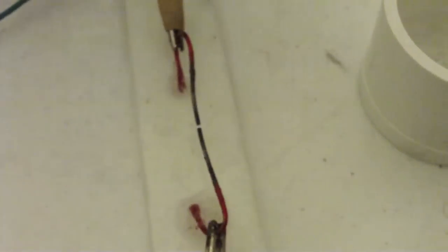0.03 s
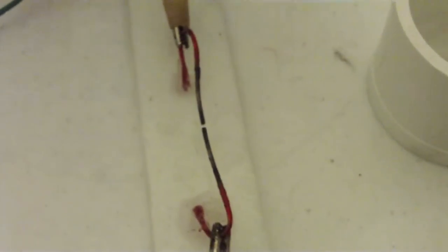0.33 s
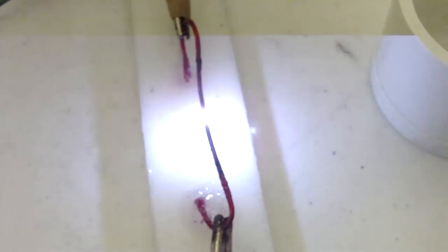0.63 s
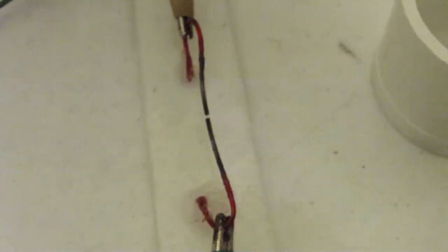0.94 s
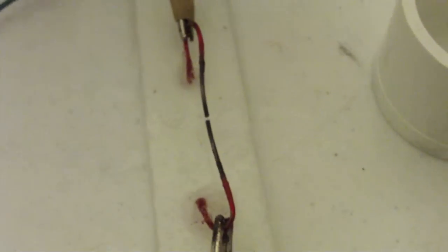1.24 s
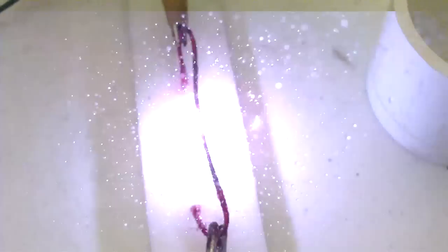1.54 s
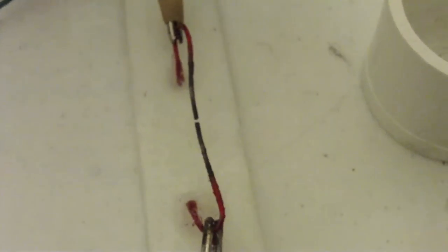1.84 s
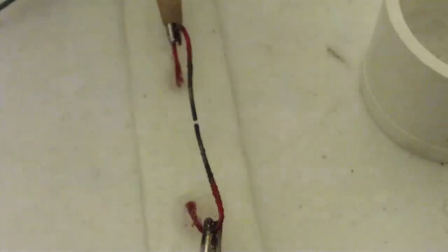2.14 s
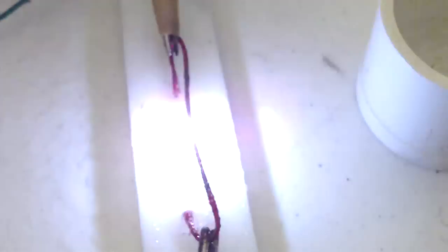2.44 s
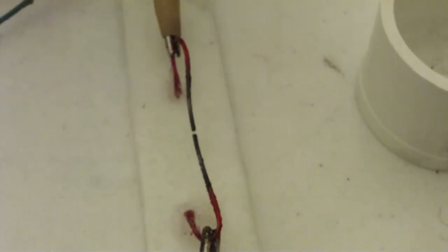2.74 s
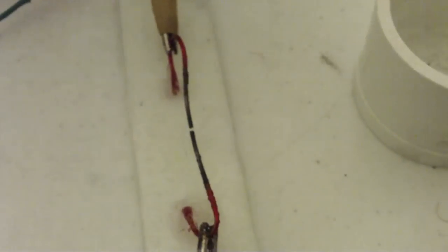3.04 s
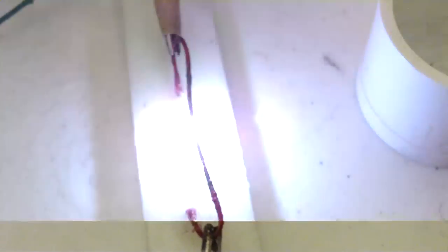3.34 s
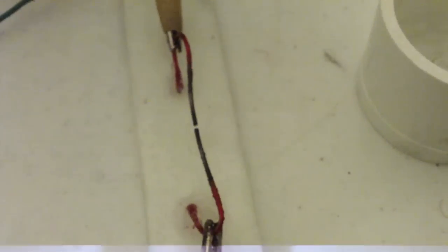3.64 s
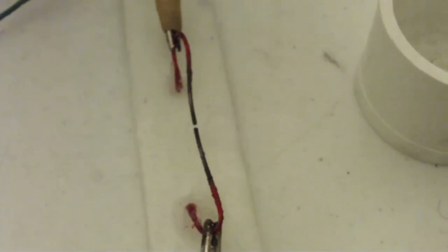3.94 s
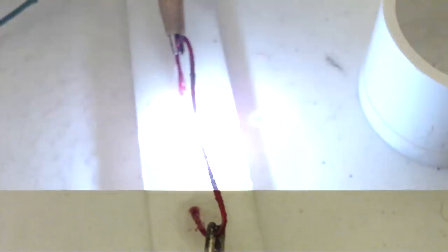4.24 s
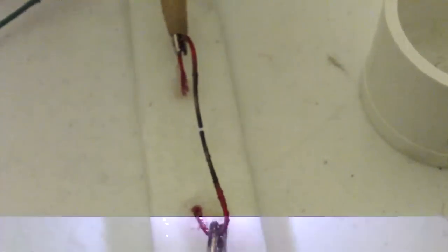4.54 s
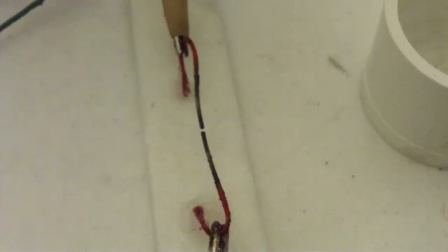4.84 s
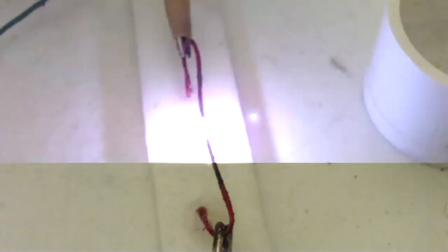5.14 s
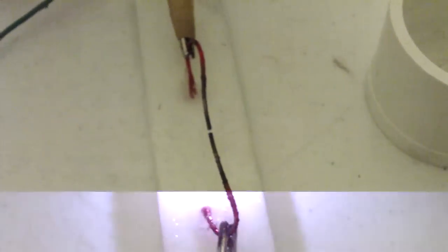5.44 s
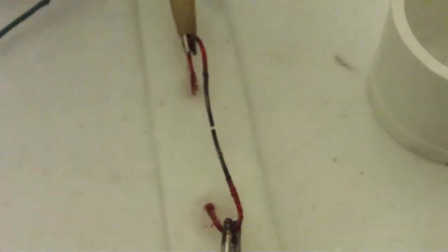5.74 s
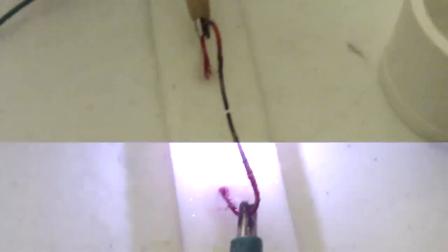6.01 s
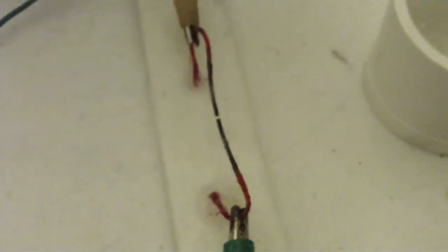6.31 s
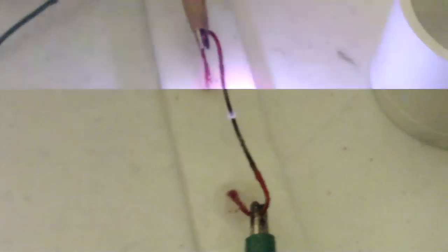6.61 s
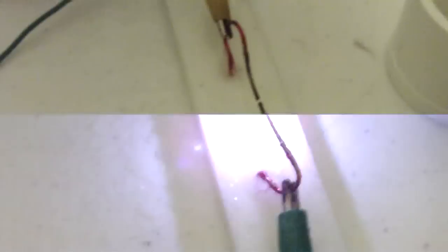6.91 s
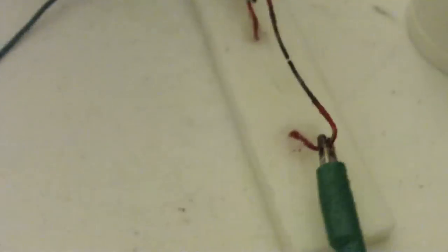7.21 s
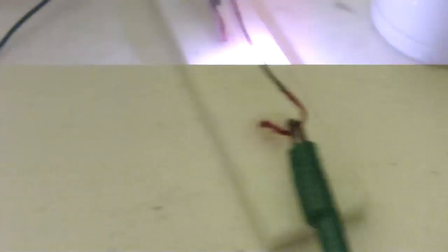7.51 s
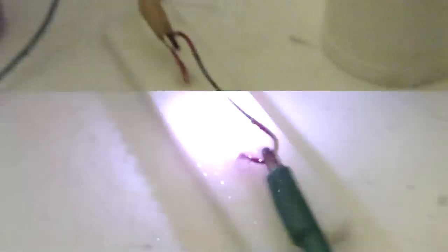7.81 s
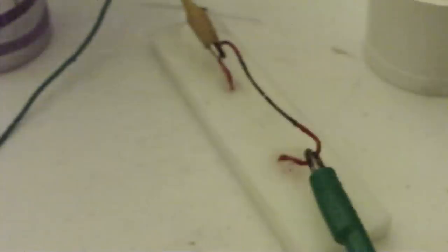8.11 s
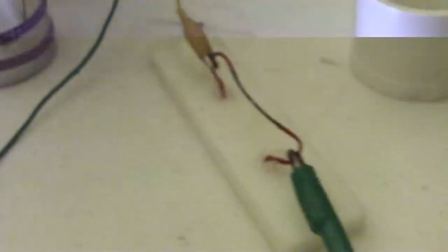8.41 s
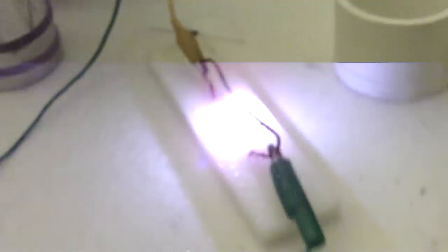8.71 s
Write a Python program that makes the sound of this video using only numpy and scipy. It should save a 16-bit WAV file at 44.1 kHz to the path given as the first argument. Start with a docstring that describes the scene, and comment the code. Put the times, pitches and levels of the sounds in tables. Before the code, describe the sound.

In a small hard room, a relay clatters in a fast, even beat while an electric spark cracks with each knock. Light at first, the sparks jump in level after about a second and a half, overloading the close microphone. They miss a few beats, leaving only the relay, and gradually soften as the rhythm carries on. Faint low rumble and occasional soft handling bumps lie underneath.

```python
"""A relay knocks and a spark gap snaps, nine times a second, over the faint rumble of a small hard room.
The relay switches a coil: it knocks open, the spark cracks and rings the metal on the bench, and it
ticks shut. The sparks start weak, surge, then sag; four times the gap fails to fire. The snaps overload
the microphone of a close hand-held camera and wake nearly the same echoes, which shift as the camera
moves. Now and then the hand bumps it."""
import sys
import numpy as np
from scipy import signal
from scipy.fft import rfft, irfft
from scipy.io import wavfile

SR = 44100
rng = np.random.default_rng(int(sys.argv[2]) if len(sys.argv) > 2 else 0)


def wav_record(signal):
    """Record a signal, one row per channel, as 16-bit PCM in the file named by sys.argv[1]."""
    frames = np.transpose(np.atleast_2d(signal))
    bounded = np.clip(frames, -1, 1)
    # unit amplitude maps onto the largest positive 16-bit level
    quanta = np.round(bounded * 32767).astype(np.int16)
    wavfile.write(sys.argv[1], SR, quanta)


N = 390726

# steady room tone: (frequency [Hz], level per Hz [dB])
ROOM_TONE = [(25, 6), (60, -14), (115, -6), (250, -12), (1000, -20), (3000, -27), (7500, -26), (11000, -40),
             (15000, -42)]
# its rumble that differs left and right: (frequency [Hz], level per Hz [dB])
SIDE_RUMBLE = [(25, 7.5), (60, 8), (150, -11), (500, -27), (2000, -49), (15000, -58)]
# wander of the relay's timer: (time [s], lateness [s])
TIMER_DRIFT = [(.3, -.0006), (1, .0009), (2.8, .0007), (3.5, -.0007), (5.2, -.0009), (7.4, .0005)]
# the relay's body: (frequency [Hz], opening level [dB], closing level [dB], t60 [s])
RELAY_MODES = [(113, -47, -33.5, 0.18), (196, -28.5, -31.5, 0.023), (480, -34, -43, 0.0079),
               (816, -32, -53, 0.043), (1090, -16, -52, 0.017), (1181, -19, -30.5, 0.019),
               (1388, -22, -54, 0.027), (2110, -25.5, -48, 0.017), (2736, -23, -50, 0.032),
               (6800, -31, -27, 0.0095)]
# level ride on the knock's high modes as the camera moves: (time [s], level [dB])
KNOCK_RIDE = [(0, -2), (2, -2), (5.2, -9), (7.2, 8.5), (8.8, 2.5)]
# colour of the snap and its scatter off the bench: (frequency [Hz], level [dB])
SNAP_COLOUR = [(60, -27), (200, -22), (550, -16.5), (800, -18), (1200, 2), (1900, -10), (2800, -3.5),
               (4500, -0.5), (6500, 0.5), (9000, 3.5), (11500, -5.5), (13500, -5), (15200, -1)]
# ring of the electrodes and their clips: (frequency [Hz], level [dB], t60 [s])
ELECTRODE_MODES = [(7335, 4.5, 0.022), (8780, -11, 0.044), (9080, -2.5, 0.03), (9720, -8.5, 0.053)]
# long resonances of things on the bench: (frequency [Hz], level [dB], t60 [s])
BENCH_MODES = [(1106, -27, 0.23), (1184, -24.5, 0.091), (1262, -28, 0.22), (1483, -24, 0.16),
               (2174, -38, 0.17), (2650, -19, 0.076), (3452, -29.5, 0.3), (4404, -27, 0.25),
               (5250, -41, 0.61), (5570, -29.5, 0.32), (6800, -25.5, 0.18)]
# slaps off nearby surfaces: (delay [s], level [dB])
SLAPS = [(.0073, -13.5), (0.0139, -11.5), (0.0622, -23)]
# colour of the room's tail: (frequency [Hz], level [dB])
ROOM_COLOUR = [(100, -3), (280, -8.5), (450, -4), (720, -7), (950, -0.5), (1250, -1.5), (1800, -2.5),
               (3000, -1.5), (5500, 0), (8800, 1), (11500, -2), (13500, -2.5), (15200, -4)]
# decay of that tail: (frequency [Hz], t60 [s])
ROOM_T60 = [(400, 0.27), (2000, 0.33), (6500, 0.36), (14000, 0.23)]
# handling bumps and creaks: (time [s], centre [Hz], width [Hz], swell sigma [s], level [dB])
HAND_BUMPS = [(1.491, 1140, 300, 0.0021, -27), (1.822, 340, 130, 0.013, -31.5),
              (3.425, 123, 171, .019, -18.5), (4.507, 139, 130, .03, -35), (4.84, 42, 30, .02, -33),
              (4.95, 50, 40, .015, -31)]
# beats on which the gap fails to fire: (cycle [count from 0])
SILENT_CYCLES = (20, 23, 25, 28)

HIT_SAMPLES = 2 ** 14
AGE = np.arange(HIT_SAMPLES) / SR  # seconds into a hit
HIT_HZ = np.fft.rfftfreq(HIT_SAMPLES, 1 / SR)
SCENE_HZ = np.fft.rfftfreq(N, 1 / SR)


def undb(db):
    """Decibels to gain."""
    return 10 ** (np.asarray(db) / 20)


def unit(x):
    """Scale to rms 1."""
    return x / np.sqrt(np.mean(np.abs(x) ** 2))


def colour(points, hz=HIT_HZ):
    """EQ curve through (frequency [Hz], level [dB]) points, scaled to rms 1."""
    point_hz, db = np.transpose(points)
    return unit(undb(np.interp(np.log(hz + 1), np.log(point_hz), db)))


def fade(t60):
    """Exponential decay that loses 60 dB in t60 seconds."""
    return np.exp(-np.log(1000) * AGE / t60)


def ring(modes):
    """Damped sines struck together: (frequency [Hz], level [dB], t60 [s])."""
    return sum(undb(db) * fade(t60) * np.sin(2 * np.pi * hz * AGE) for hz, db, t60 in modes)


def add(track, times, sounds):
    """Mix each sound into the track at its time."""
    for at_s, sound in zip(times, sounds):
        start = int(round(at_s * SR))
        first, last = max(start, 0), min(start + len(sound), N)
        if last > first:
            track[first:last] += sound[first - start:last - start]


def camera_travel(times, creep_m_per_s=.04, swing_m_per_s=.1, swing_at_s=5.6):
    """Metres the camera has moved: a slow creep, then a faster swing round the gap."""
    return creep_m_per_s * np.minimum(times, swing_at_s) + swing_m_per_s * np.maximum(times - swing_at_s, 0)


def paths(moved_m):
    """Spectra of a tangle of sound paths, one per camera position; moving shifts treble phases first."""
    phase, slant = rng.uniform(-1, 1, (2, len(HIT_HZ)))
    lag_s = np.outer(moved_m, slant) / 343  # speed of sound, m/s
    return np.sqrt(HIT_SAMPLES) * np.exp(1j * np.pi * (phase + 2 * HIT_HZ * lag_s))


def room_tone(mid_db=-42, side_db=-49):
    """A bed of wide low rumble and faint centred hiss."""
    mid, side = (unit(irfft(rfft(rng.standard_normal(N)) * colour(points, SCENE_HZ), N))
                 for points in (ROOM_TONE, SIDE_RUMBLE))
    return undb(mid_db) * mid + undb(side_db) * np.array([side, -side])


def relay(modes, moved_m, click_db, click_t60, room_db):
    """The armature hits its stop: a metallic click, a ringing body and a touch of room."""
    click_eq = colour([(200, -21), (1500, 7.5), (7000, 2.5), (12000, 0), (15000, 3)])
    tail_eq = colour([(200, 5.5), (700, -22), (1150, 12), (1800, 2.5), (7000, -2), (15000, -12)])
    click = irfft(paths(moved_m) * click_eq) * fade(click_t60)
    tail = irfft(paths(moved_m) * tail_eq) * fade(0.27)
    return ring(modes) + undb(click_db) * click + undb(room_db) * tail


def spark_strength(times, weak_db=-11, full_db=.6, settled_db=-4.5, surge_at_s=1.495, surge_s=.2):
    """The sparks' level ride in dB: a weak start, a quick surge, a slow sag until it settles."""
    surge = np.clip((times - surge_at_s) / surge_s, 0, 1)
    sag_db = 0.82 * np.maximum(times - surge_at_s - surge_s, 0)
    strong_db = np.maximum(full_db - sag_db, settled_db)
    return weak_db + surge * (strong_db - weak_db)


def sparks(times, moved_m, snap_db=6.6, thud_db=-11.5, slap_db=-.5, room_db=-12.5, off_beam_s=6.64):
    """Each discharge: a snap scattered by the bench, ringing metal, a few slaps, then the room."""
    strength_db = spark_strength(times)[:, None]
    # stronger sparks are longer and duller
    snap_t60 = 0.015 * np.exp(.032 * strength_db)
    tilt_db_per_octave = -0.64 - 0.0772 * strength_db
    tilt = undb(tilt_db_per_octave * np.log2(np.maximum(HIT_HZ, 500) / 5000))
    snap = undb(snap_db) * irfft(paths(moved_m) * colour(SNAP_COLOUR) * tilt) * fade(snap_t60)
    thud = undb(thud_db) * fade(0.0042)  # the heated air pushes outward once
    # the electrodes' ring fades as the camera swings out of their beam
    ring_db = -5 - 12 * np.maximum(times - off_beam_s, 0)[:, None]
    electrodes = undb(ring_db) * ring(ELECTRODE_MODES)
    # flat surfaces throw back the snap's sharp attack
    attack = snap * fade(0.0063)
    slaps = undb(slap_db) * sum(undb(db) * np.roll(attack, int(delay * SR), axis=1) for delay, db in SLAPS)
    tail = undb(room_db) * room_tail(paths(moved_m) * tilt)
    direct = undb(.4 * strength_db) * (snap + thud)  # swells less than the ring-out
    ring_out = undb(strength_db) * (electrodes + slaps + tail + ring(BENCH_MODES))
    jitter_db = 0.4 * rng.standard_normal((len(times), 1))
    return (direct + ring_out) * undb(jitter_db)


def room_tail(spectra, build_s=0.0032):
    """Diffuse reverb that blooms quickly; the top end dies soonest."""
    band_hz, band_t60 = np.transpose(ROOM_T60)
    bands = [np.interp(np.log(HIT_HZ + 1), np.log(band_hz), row) for row in np.eye(len(band_hz))]
    coloured = spectra * colour(ROOM_COLOUR)
    tail = sum(irfft(coloured * band) * fade(t60) for band, t60 in zip(bands, band_t60))
    return tail * (1 - np.exp(-AGE / build_s))


def handling():
    """Soft bumps and creaks as the hand shifts its grip: short swells of narrow-band noise."""
    t = np.arange(N) / SR
    noise = rfft(rng.standard_normal(N))
    track = np.zeros(N)
    for at_s, centre_hz, width_hz, sigma_s, db in HAND_BUMPS:
        body = irfft(noise / (1 + (2 * (SCENE_HZ - centre_hz) / width_hz) ** 4), N)
        swell = np.exp(-.5 * ((t - at_s) / sigma_s) ** 2)
        body_rms = np.sqrt(np.average(body ** 2, weights=swell))
        track += undb(db) * body * swell / body_rms
    return track


def scene(first_s=.07324, period_s=.1121955, close_after_s=.0482, beam_hz=800):
    """The relay keeps the beat; the gap fires on nearly every opening."""
    cycles = np.arange(-1, N / SR / period_s)
    beat = first_s + period_s * cycles
    times = beat + np.interp(beat, *np.transpose(TIMER_DRIFT))
    moved_m = camera_travel(times)
    fires = ~np.isin(cycles, SILENT_CYCLES)
    # the knock's low modes spread evenly; its high ones beam, so they depend on where the camera is
    ride_db = np.interp(times, *np.transpose(KNOCK_RIDE))[:, None]
    open_modes = [(hz, db + min(hz / beam_hz, 1) ** 2 * ride_db, t60) for hz, db, _, t60 in RELAY_MODES]
    close_modes = [(hz, db, t60) for hz, _, db, t60 in RELAY_MODES]
    knocks = relay(open_modes, moved_m, click_db=-21.5, click_t60=0.026, room_db=-37)
    ticks = relay(close_modes, moved_m, click_db=-25.5, click_t60=0.031, room_db=-41.5)
    bench = np.zeros(N)
    add(bench, times, knocks)
    add(bench, times + close_after_s, ticks)
    add(bench, times[fires], sparks(times[fires], moved_m[fires]))
    return bench + handling() + room_tone()


def record(dry, shelf_hz=600, bass_db=-8, top_hz=15500):
    """The snaps soft-clip the input; then the bass is thinned and the top is cut."""
    dc_offset = np.array([[.04], [-.04]])  # left clips first on the upswing, right on the downswing
    biased = dry + dc_offset
    clipped = biased / (1 + biased ** 8) ** (1 / 8) - dc_offset
    bass = signal.sosfilt(signal.butter(1, shelf_hz, fs=SR, output="sos"), clipped)
    thinned = clipped + (undb(bass_db) - 1) * bass
    high_cut = signal.ellip(10, .2, 80, top_hz, fs=SR, output="sos")
    return dc_offset + signal.sosfilt(high_cut, thinned)


dry = scene()
out = record(dry)
wav_record(out)
```